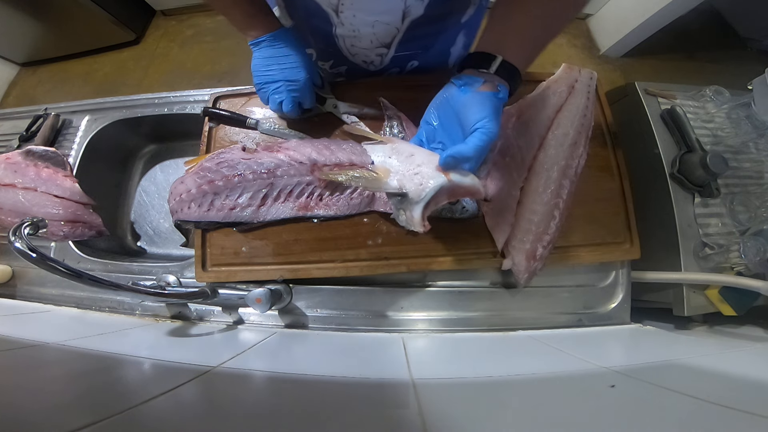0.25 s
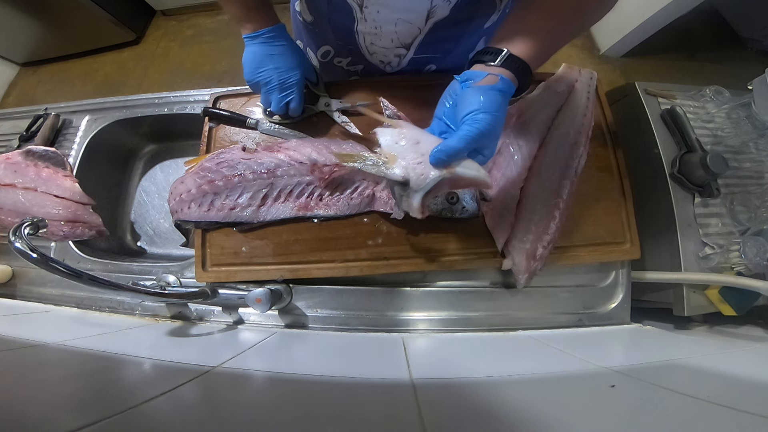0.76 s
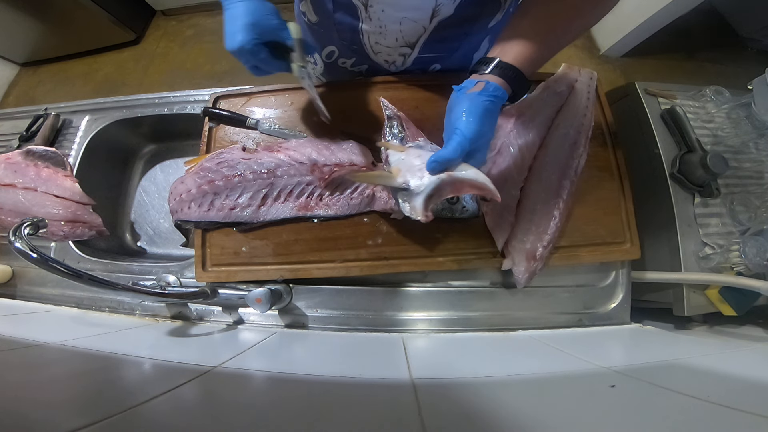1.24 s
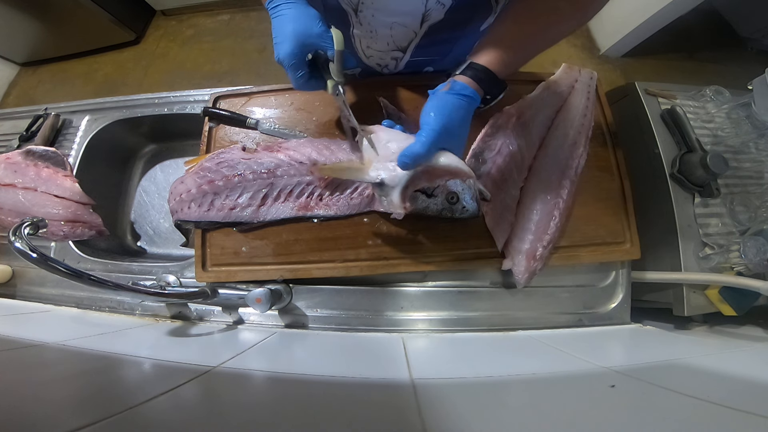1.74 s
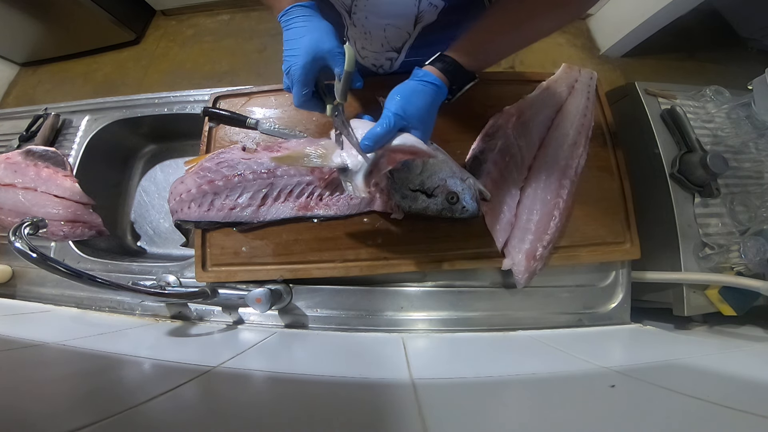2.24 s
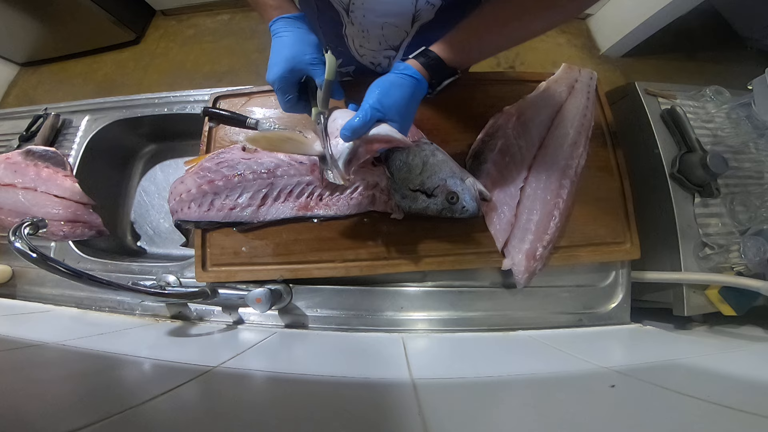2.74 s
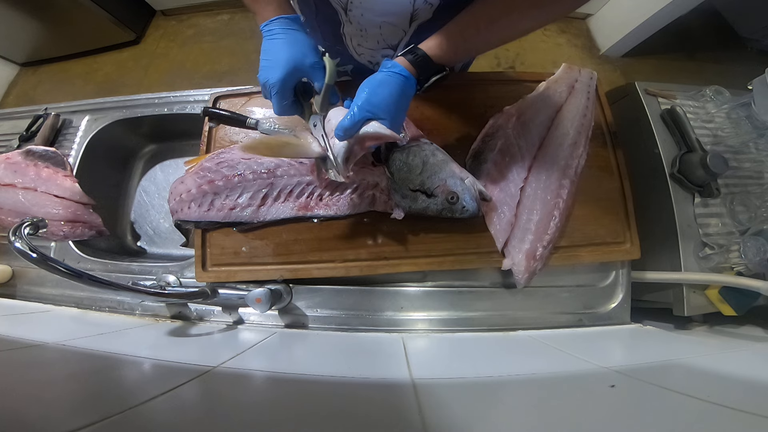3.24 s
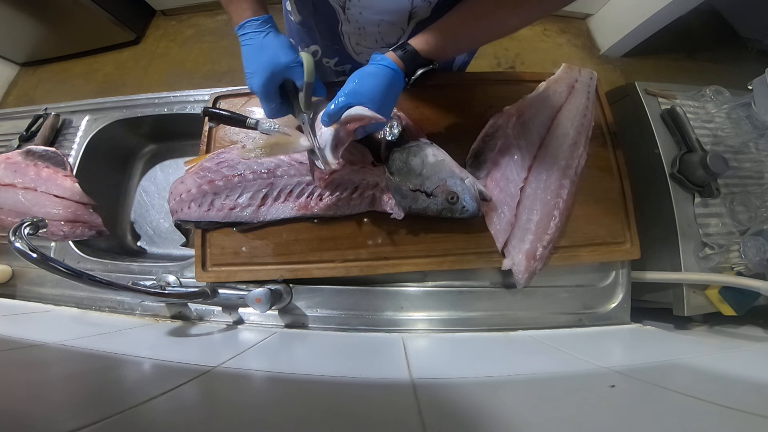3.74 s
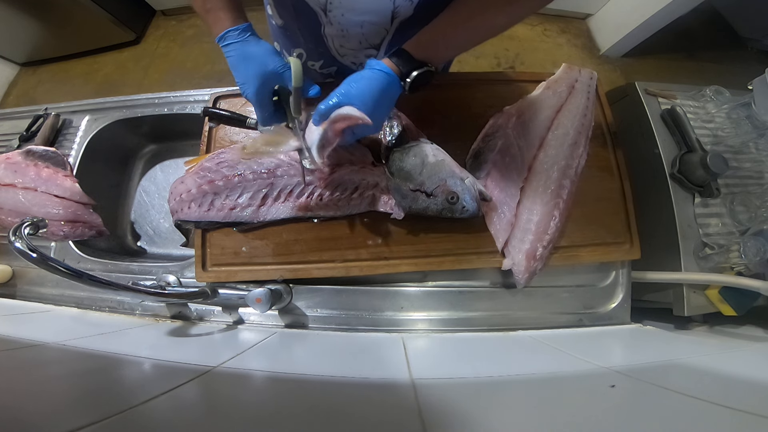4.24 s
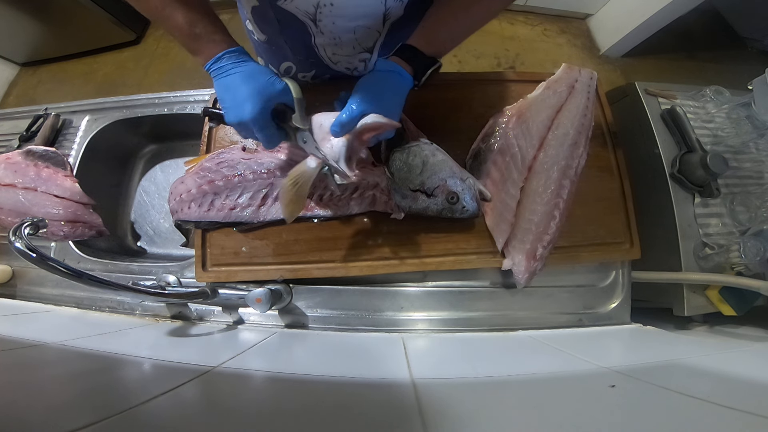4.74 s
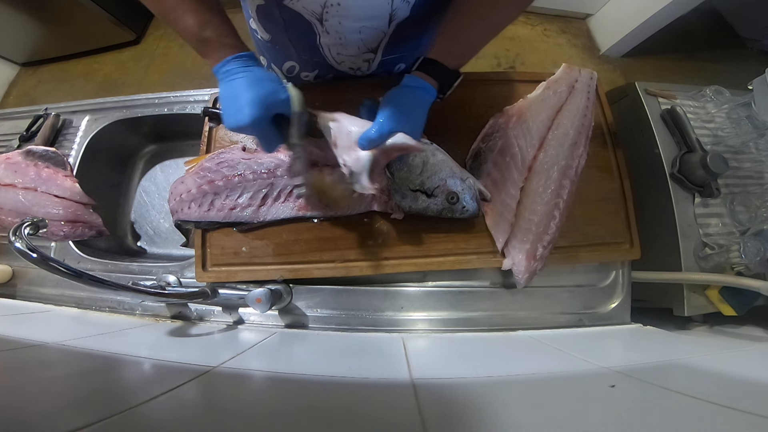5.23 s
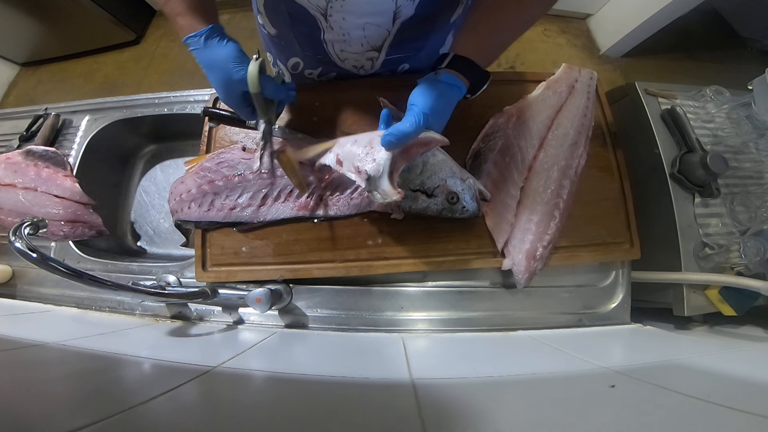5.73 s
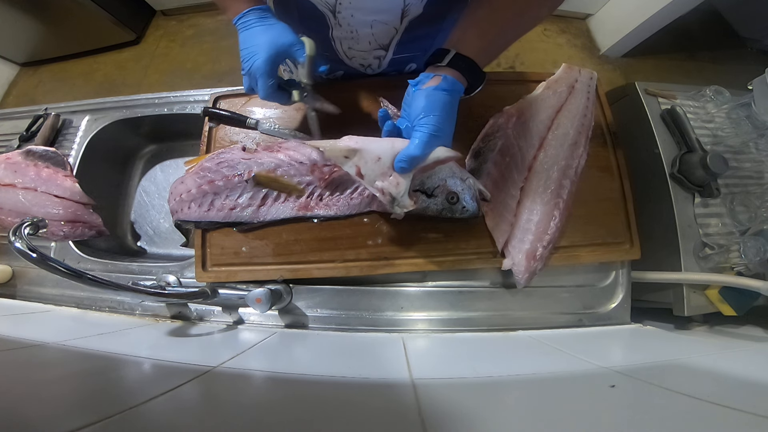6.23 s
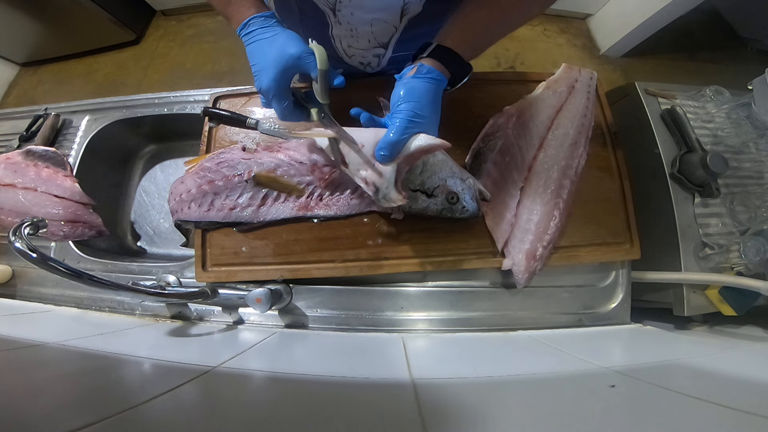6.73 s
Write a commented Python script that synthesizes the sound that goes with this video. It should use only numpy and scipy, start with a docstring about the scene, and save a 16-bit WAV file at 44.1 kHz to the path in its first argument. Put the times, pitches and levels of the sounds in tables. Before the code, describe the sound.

Kitchen scissors knock and scrape on a wooden board, then snip through wet fish with small clicks and a late burst of loud bone cracks.

```python
"""Kitchen scissors work through a fish collar on a wooden board beside a steel sink, heard by one close microphone.
First the scissors knock and drag on the board amid loud snaps, and soft pushes make the counter boom. Then the
blades snip skin and crack bone (short noise bursts and ringing modes), with one faint squeak, while gloves and
wet flesh rustle in tiny grains. The strongest run of cracks comes late, and mostly rustle is left at the end.
Throughout, a small hard kitchen echoes the sounds of the hands, and a fridge-like drone of shaped noise lies below."""
import sys
import numpy as np
from scipy import signal
from scipy.fft import rfft, irfft, next_fast_len
from scipy.io import wavfile

SR = 44100
rng = np.random.default_rng(int(sys.argv[2]) if len(sys.argv) > 2 else 0)


def decibels_to_gain(level_db):
    """Convert a level in decibels to a linear amplitude gain (20 dB per decade)."""
    exponent = np.asarray(level_db, float) / 20
    return 10 ** exponent


def unload_audio(sound):
    """Save the sound as a 16-bit wav file, at the path given as the first command line argument."""
    columns = np.transpose(np.atleast_2d(sound))
    # keep every value between -1 and 1, then stretch to whole-number steps
    steps = np.round(np.clip(columns, -1, 1) * 32767)
    wavfile.write(sys.argv[1], SR, steps.astype(np.int16))


N = 307802  # length in samples, about 7 s

# blade snips and bone cracks:
# (time [s], level [dB], pitch [Hz], dull part against the level [dB], airy part against the level [dB])
SNIPS = [(0.0965, -39.5, 6200, -17, -26), (0.128, -18, 6900, -11, -7.5), (0.3161, -21.5, 5740, -2, -8),
         (0.827, -52, 6940, -20, -25), (0.994, -43.5, 6900, 1.5, -9), (1.088, -49, 7200, -4, -35),
         (1.481, -35, 6800, -21, -48), (1.8255, -51, 5370, -30, -29), (2.157, -53.5, 6900, -20, -30),
         (2.216, -48, 6360, -16, -26), (2.3351, -57, 4550, 4.5, -31), (2.4142, -47, 7700, -14, -11),
         (2.595, -53.5, 6700, -17, -36), (2.7622, -45, 4900, -34, -22), (2.806, -40, 6500, -16, -13),
         (3.198, -50.5, 5700, -32, -35), (3.3393, -51, 7000, -18, -32), (3.391, -43.5, 7800, -19, -39),
         (3.419, -39.5, 6500, -9, -35), (3.4388, -29, 6830, -5, -36), (3.676, -41.5, 4800, -26, -18),
         (3.687, -38, 6000, -30, -30), (3.7552, -38.5, 6050, -5.5, -9), (3.789, -42.5, 7550, -19, -25),
         (3.848, -50, 5440, -23, -29), (3.8938, -43, 7000, -17, -21), (3.93, -34, 7140, -19, -42),
         (3.9698, -42, 6350, -15, -21), (4.0108, -39.5, 4930, -22, -34), (4.021, -30.5, 7150, -23, -35),
         (4.2108, -43.5, 7450, -15, -36), (4.4278, -40, 6500, -16, -31), (4.5045, -38.5, 5560, -9, -41),
         (4.532, -40, 5300, -9, -43), (4.544, -39, 6330, -8, -30), (4.563, -30.5, 7200, -5, -36),
         (4.579, -23, 5400, -18, -36), (4.59, -20.5, 7200, -4.5, -43), (4.6335, -29.5, 7560, -2.5, -30),
         (4.6449, -15.5, 6500, -27, -46), (4.6874, -55, 6260, -28.5, -29), (4.81, -55, 6100, -13, -25),
         (4.9806, -53, 4680, -18, -40), (5.0394, -25, 4520, -18, -23.5), (5.09, -37.5, 8100, -29.5, -35),
         (5.094, -31, 7550, -23, -33), (5.14, -34.5, 6750, -44, -44), (5.182, -20.5, 8100, -17.5, 5.5),
         (5.1874, -12.5, 6680, -17, -26), (5.1899, -14, 5980, -16, -33), (5.1961, -12.5, 6560, -10.5, -39),
         (5.386, -37, 6260, -22, -25), (5.393, -41.5, 4300, -9, -35), (5.3926, -36.5, 6400, -17.5, -40),
         (5.8593, -52.5, 4000, -28, -27.5), (5.9771, -51, 6250, -32, -14), (6.7391, -54, 6900, -12, -33)]
# ringing modes of the board and draining tray: (pitch [Hz], level [dB], time to die by 60 dB [s])
BOARD = [(330, -18.5, .1), (439, 4, 0.12), (474, 2, .07), (507, -9.5, 0.042), (636, -2.5, 0.15),
         (732, 1.5, 0.25), (832, 4, 0.072), (969, 5, 0.087), (1064, -2, .12), (1196, 1.5, 0.058),
         (1271, 0, 0.11), (1490, -16, .07), (1613, -20.5, 0.088), (1810, -16, .09), (1900, -2, 0.11),
         (2334, -4.5, .08), (2263, -4, 0.14), (2406, -7.5, 0.18), (2720, -8, 0.12)]


def rms_one(x):
    """Scale a sound to unit rms, its average strength."""
    return x / np.sqrt(np.mean(x ** 2) + 1e-20)


def in_time(rows):
    """Columns of a (time, value, ..) table at every sample; -150 outside its rows."""
    s, *columns = np.transpose(rows)
    return [np.interp(np.arange(N) / SR, s, c, left=-150, right=-150) for c in columns]


def at_hz(points, hz):
    """Read a (Hz, value) table between its points, on a log-frequency axis."""
    table_hz, values = np.transpose(points)
    return np.interp(np.log(hz + 1), np.log(table_hz), values)


def coloured(x, spectrum):
    """Give a steady signal the tone of a (Hz, dB) table, at unit rms."""
    size = next_fast_len(len(x))
    hz = np.arange(size // 2 + 1) * SR / size
    shaped = irfft(rfft(x, size) * decibels_to_gain(at_hz(spectrum, hz)), size)
    return rms_one(shaped[:len(x)])


def band(x, low_hz, high_hz):
    """Keep the sound between two frequencies."""
    return signal.sosfilt(signal.butter(2, [low_hz, high_hz], "band", fs=SR, output="sos"), x)


def drift(rate):
    """Wander through random values of spread 1, so many per second, joined by straight lines."""
    knots = rng.standard_normal(int(N / SR * rate) + 2)
    return np.interp(np.arange(N) / SR * rate, np.arange(len(knots)), knots)


def ring(force, hz, t60):
    """One mode set ringing by a force; it dies by 60 dB in t60 seconds."""
    r = decibels_to_gain(-60 / (t60 * SR))
    w = 2 * np.pi * hz / SR
    return signal.lfilter([0, np.sin(w)], [1, -2 * r * np.cos(w), r * r], force + 1e-18)


def burst(length_ms, lumpy):
    """A fracture: noise of uneven micro-breaks that builds in a fraction of its length, then dies."""
    t = np.arange(3072) / SR / (max(length_ms, .3) / 1000)  # time counted in lengths
    unevenness = decibels_to_gain(lumpy * rng.standard_normal(96)).repeat(32)
    breaks = rng.standard_normal(3072) * unevenness
    return breaks * np.minimum(t / .12, 1) * np.exp(-t)


def add(track, s, db, sound):
    """Lay a short sound into the track at s seconds, its peak at db."""
    at = round(s * SR)
    track[at:at + len(sound)] += (decibels_to_gain(db) * sound / np.abs(sound).max())[:N - at]


def grains(per_s, spread_db):
    """Tiny clicks in random clumps, of uneven size; a larger spread_db lets a few stand out more."""
    born = rng.random(N) < per_s * decibels_to_gain(3.0 * drift(40)) / SR
    size = decibels_to_gain(spread_db * np.minimum(rng.exponential(1, N), 5))
    return born * size * rng.choice([-1, 1], N)


def swells(s, db, rise_ms, hold_ms, fade_db_per_s):
    """Gain of overlapping swells: straight rise in dB (rise_ms per 10 dB), hold, shared fade; powers add."""
    t = np.arange(0, N / SR + .001, .001)[:, None]  # worked out every millisecond
    rise_db = (s - t) * 1e4 / np.maximum(rise_ms, 1)
    fade_db = (t - s - hold_ms / 1000) * fade_db_per_s
    below_db = np.maximum(np.maximum(rise_db, fade_db), 0)
    gain = np.sqrt(np.sum(decibels_to_gain(db - below_db) ** 2, axis=1))
    return np.interp(np.arange(N) / SR, t[:, 0], gain)


def snips():
    """Each break excites a blade ring of its own pitch over a broad crack, a dull and an airy part."""
    steel_hz, steel_t60_s, steel_db = 4325, .2, -15  # the steel's long ring
    steel_loss_db = 61  # per octave squared: breaks near its pitch excite it most
    out = np.zeros(N)
    for s, peak_db, hz, dull_db, air_db in SNIPS:
        force = burst(3.93, lumpy=0.6)
        crack = rms_one(band(force, 3200, 7800)) + decibels_to_gain(-1.5) * rms_one(ring(force, hz, 0.0086))
        add(out, s, peak_db, crack)
        ring_db = peak_db + steel_db - steel_loss_db * np.log2(hz / steel_hz) ** 2
        add(out, s, ring_db, ring(np.pad(force, (0, SR // 6)), steel_hz, steel_t60_s))
        add(out, s, peak_db + dull_db, band(force, 2100, 3300))
        add(out, s, peak_db + air_db, band(force, 8000, 16000))
    return out


def rustle():
    """Gloves and wet flesh stick and peel in bright, dull and crackling grains; after each snip the kitchen's
    late echo dies away as a hiss."""
    # the hands squeeze or shift the fish: (time of full level [s], level [dB], rise [ms per 10 dB],
    # hold [ms], dull wet part against the level [dB])
    squeezes = [(0.018, -55.5, 4.5, 3.4, 4), (0.354, -61.5, 47, 5.8, 14), (0.551, -62, 110, 3.9, 9.5),
                (0.724, -57.5, 70, 3.2, 0), (0.826, -51.5, 4, 8.9, 6.5), (0.94, -62.5, 54, 46, 5.5),
                (1.239, -58, 127, 3.1, -6), (1.36, -66, 83, 250, -3.5), (1.58, -77, 60, 22, -14),
                (1.731, -61.5, 124, 31, -24), (1.858, -67.5, 66, 52, 2), (2.245, -67.5, 117, 3.2, 1),
                (2.434, -66.5, 130, 19, -4), (2.62, -72.5, 72, 100, -3), (2.813, -58.5, 27, 39, -1.5),
                (3.055, -61.5, 45, 7.3, -12), (3.208, -67.5, 78, 62, -10), (3.45, -51.5, 46, 11, -14),
                (3.687, -56, 106, 4.5, -9), (3.74, -64.5, 38, 120, -5), (4.03, -53.5, 110, 4, -8),
                (4.245, -57, 57, 5, -6.5), (4.43, -61, 58, 30, -41), (4.588, -49, 110, 22, -7),
                (4.66, -49.5, 42, 5, -5), (4.85, -56.5, 70, 38, -5.5), (4.978, -53, 7, 4.6, -25.5),
                (5.1, -59, 63, 79, -23.5), (5.415, -62, 50, 6, -12), (5.588, -64, 58, 51, -7),
                (5.882, -64.5, 158, 7, -4.5), (6.0, -72, 76, 40, -13), (6.188, -74, 146, 5, -13),
                (6.84, -69, 117.5, 70, 1.5)]
    # tone of the bright grains: (frequency [Hz], level [dB per Hz])
    bright_tone = [(590, -44), (1000, -39), (1320, -20.5), (1990, -20), (3740, -8.5), (4240, -3.5),
                   (6260, 1), (7970, -4.5), (13200, -41), (15500, -49)]
    fade_db_per_s, resting_db = 152, -81
    s, db, rise_ms, hold_ms, wet_db = np.transpose(squeezes)
    snip_s, snip_db = np.transpose(SNIPS)[:2]
    squeeze = swells(s, db, rise_ms, hold_ms, fade_db_per_s)
    wet_squeeze = swells(s, db + wet_db, rise_ms, hold_ms, fade_db_per_s)
    # each snip's late echo in the kitchen, louder by 0.84 dB for each dB of the snip
    after = swells(snip_s + .004, -31 + 0.84 * snip_db, 1.8, 7.6, fade_db_per_s)
    bright_gain = np.sqrt(squeeze ** 2 + after ** 2 + decibels_to_gain(resting_db) ** 2)
    dull_gain = np.sqrt(wet_squeeze ** 2 + (decibels_to_gain(-20) * after) ** 2 + decibels_to_gain(resting_db - 8.5) ** 2)

    bright = coloured(grains(2500, spread_db=-1.5), bright_tone)
    dull = rms_one(band(grains(1600, spread_db=3.0), 900, 3300))
    # lone crackles, about 40 per second at each pitch
    crackles = rms_one(sum(ring(grains(40, spread_db=4.5), hz, 0.011) for hz in (4300, 5300, 6500, 7490)))
    flutter = decibels_to_gain(0.74 * drift(30))
    return flutter * (bright_gain * bright + decibels_to_gain(-7.5) * dull_gain * dull) + decibels_to_gain(-11) * squeeze * crackles


def knocks():
    """Steel on wood: a blow favours the modes near its own pitch, over a dull clack."""
    # scissors against the board: (time [s], level [dB], pitch of the blow [Hz], length [ms])
    blows = [(0.012, -36, 630, 4.6), (.128, -27.5, 440, 2.2), (.133, -23.5, 2250, 6.3),
             (.317, -29, 1280, 5.4), (.832, -44.5, 1600, 14), (.836, -40.5, 1110, 14.4),
             (.945, -50, 880, 6.6), (0.994, -48, 2750, 2), (4.592, -54, 700, 5.3), (4.645, -47.5, 524, 1.7),
             (4.665, -49, 465, 3.1), (5.04, -59, 450, 0.88), (5.187, -39, 525, 8.3),
             (5.197, -38.5, 556, 2.7), (5.977, -61.5, 673, 8)]
    out = np.zeros(N)
    for s, peak_db, blow_hz, length_ms in blows:
        force = np.pad(burst(length_ms, lumpy=2.0), (0, SR // 4))
        modes = 0
        for hz, db, t60 in BOARD:
            chance = 1.5 * rng.standard_normal()  # each blow shifts a mode's level and pitch a little
            mode_db = db + chance - 6.1 * np.log2(hz / blow_hz) ** 2
            modes = modes + decibels_to_gain(mode_db) * ring(force, hz * (1 + 0.004 * chance), t60)
        add(out, s, peak_db, modes)
        add(out, s, peak_db - 1.0, band(force, 0.43 * blow_hz, 1.67 * blow_hz))
    return out


def drag():
    """Scissors drag over the board: dense slips feed its modes and scratch."""
    # strokes: (time of full level [s], level [dB], rise [ms per 10 dB], hold [ms])
    strokes = [(0.398, -41.5, 21, 3.2), (0.536, -42, 84, 3.9), (0.711, -43.5, 55, 12), (0.84, -51, 6, 50),
               (0.994, -63, 8, 5)]
    slips = grains(400, spread_db=3.0)
    # the modes die sooner than after a knock, and the higher ones are weaker
    body = sum(decibels_to_gain(db - 2.2 * np.log2(hz / 1000)) * ring(slips, hz, 0.36 * t60) for hz, db, t60 in BOARD)
    scratch = band(slips, 400, 3700)
    gain = swells(*np.transpose(strokes), fade_db_per_s=245)
    return gain * (decibels_to_gain(-10.5) * rms_one(body) + decibels_to_gain(-19) * rms_one(scratch))


def squeak():
    """A thin, rough, broken tone as the blades turn: a sine whose pitch and level jitter."""
    # pivot squeak: (time [s], pitch [Hz], level [dB])
    glide = [(1.74, 3860, -92), (1.8, 4400, -73), (1.83, 5100, -62), (1.89, 5110, -70), (1.92, 5850, -76),
             (2.01, 5520, -72), (2.07, 5800, -75), (2.17, 5840, -84), (2.2, 6060, -95)]
    hz, level_db = in_time(glide)
    rough_hz = hz * (1 + .02 * drift(900))
    return decibels_to_gain(level_db + 5 * drift(70)) * np.sin(2 * np.pi * np.cumsum(rough_hz) / SR)


def thumps():
    """The counter shudders at a few low pitches under a push until the hand damps it."""
    # soft pushes that make the counter boom: (time [s], level [dB], length [ms])
    pushes = [(0.01, -41.5, 96), (0.128, -43.5, 94), (0.324, -40, 51), (0.35, -29, 97), (0.455, -45, 83),
              (0.64, -49.5, 36), (0.831, -52, 100), (4.66, -59, 21), (5.189, -49, 40), (5.969, -55, 63)]
    # the counter's modes: (pitch [Hz], level [dB])
    counter = [(62, -11), (128, 1), (160, -3.5), (190, -6.5)]
    out = np.zeros(N)
    for s, db, length_ms in pushes:
        t = np.arange(int(length_ms * SR / 1000)) / SR
        swell = np.sin(np.pi * (t / t[-1]) ** 0.45) ** 0.77  # rises faster than it falls
        boom = 0
        for hz, level_db in counter:
            phase = rng.uniform(0, 2 * np.pi)
            boom = boom + decibels_to_gain(level_db) * np.sin(2 * np.pi * hz * t + phase)
        add(out, s, db, swell * boom)
    return out


def kitchen(x):
    """Dense echoes from hard walls, each octave dying at its own rate."""
    # how long the echoes last: (frequency [Hz], time to die by 60 dB [s])
    echo_times = [(300, 0.31), (1500, 0.26), (4000, 0.11), (8000, 0.12), (14000, 0.32)]
    t = np.arange(SR // 2) / SR
    edges = 80 * 2. ** np.arange(9)
    echoes = np.zeros(len(t))
    for low, high in zip(edges, edges[1:]):
        noise = band(rng.standard_normal(len(t)), low, min(high, .45 * SR))
        echoes += noise * decibels_to_gain(-60 * t / at_hz(echo_times, np.sqrt(low * high)))
    echoes *= np.clip((t - .002) / 0.0013, 0, 1)  # the nearest wall answers after a few ms
    echoes /= np.sqrt(np.sum(echoes ** 2))
    return signal.fftconvolve(x, decibels_to_gain(-7.5) * echoes)[:N]


def housing(x):
    """The case around the microphone shuts out deep bass and the highest treble."""
    x = signal.sosfilt(signal.butter(2, 95, "high", fs=SR, output="sos"), x)
    return signal.sosfilt(signal.butter(3, 9000, fs=SR, output="sos"), x)


def drone():
    """Steady machine noise and hiss, strongest near 200 Hz, that wavers in level."""
    # tone of the drone: (frequency [Hz], level [dB per Hz])
    hum_tone = [(15, -36.5), (25, -14), (113, -24.5), (136, -11.5), (198, -4), (253, -8.5), (297, -11.5),
                (368, -18), (523, -25), (684, -18.5), (997, -23.5), (1080, -29), (1800, -31), (5430, -32.5),
                (15500, -51)]
    # loudness of the drone: (time [s], level [dB])
    hum_level = [(0.0, -62), (0.31, -55.5), (0.62, -65), (1.09, -65.5), (2.93, -66.5), (3.28, -65),
                 (4.08, -65), (4.53, -64.5), (5.31, -66), (6.98, -69)]
    level_db = in_time(hum_level)[0] + 0.92 * drift(7.2)
    return decibels_to_gain(level_db) * coloured(rng.standard_normal(N), hum_tone)


def scene():
    """The hands and their echoes and the thumps pass the case, the drone joins; two equal channels."""
    hands = snips() + knocks() + rustle() + drag() + squeak()
    close = housing(hands + kitchen(hands) + thumps())
    return np.tile(close + drone(), (2, 1))


def top_cut(x):
    """Nothing passes above the cut-off."""
    return signal.sosfilt(signal.butter(12, 16270, fs=SR, output="sos"), x)


def record(dry):
    """Two channels that differ only faintly, except in the top treble, each with its own hiss."""
    dry = 0.25 * np.tanh(dry / 0.29)  # the loudest snap is rounded off
    dry = signal.sosfilt(signal.cheby2(8, 40, 16300, fs=SR, output="sos"), dry)
    # a copy some 7 ms late is added to one channel and taken from the other
    late = np.roll(dry[0], 300)
    top = signal.sosfilt(signal.butter(6, 11800, "high", fs=SR, output="sos"), late)
    difference = (decibels_to_gain(-36) * late + decibels_to_gain(-6.5) * top) * [[1], [-1]]
    hiss = band(rng.standard_normal(dry.shape), 9800, 13600)
    return top_cut(dry + difference + decibels_to_gain(-90.5) * hiss)


dry = scene()
out = record(dry)
unload_audio(out)
```